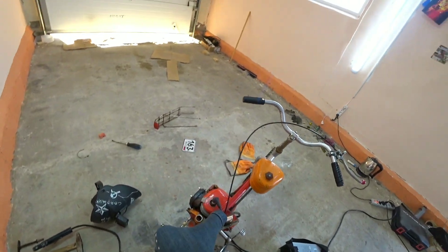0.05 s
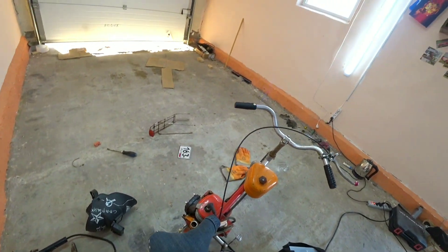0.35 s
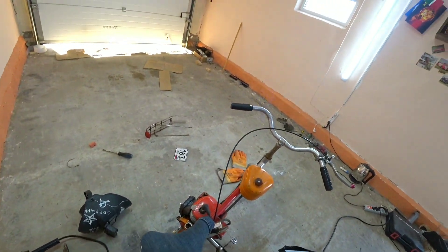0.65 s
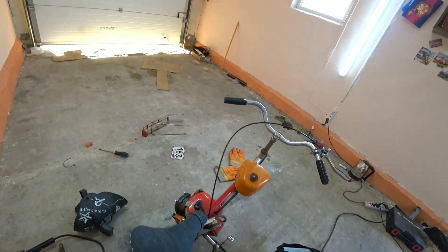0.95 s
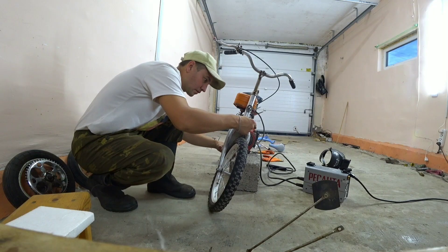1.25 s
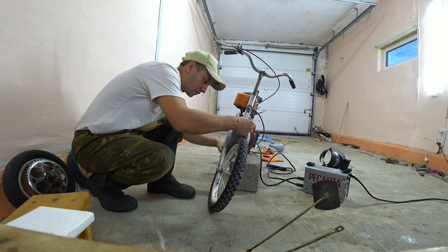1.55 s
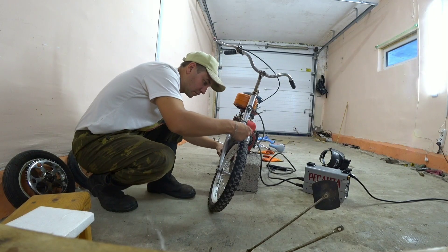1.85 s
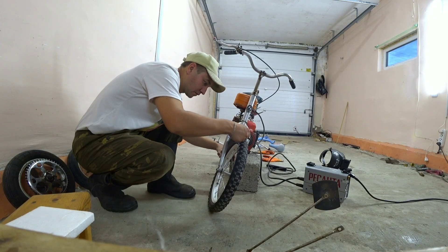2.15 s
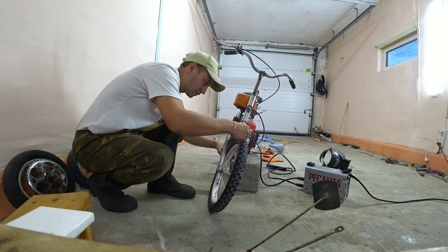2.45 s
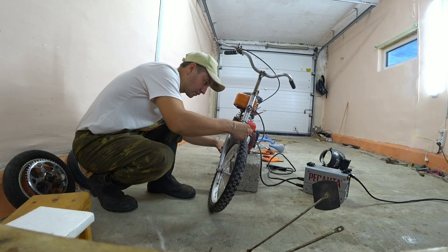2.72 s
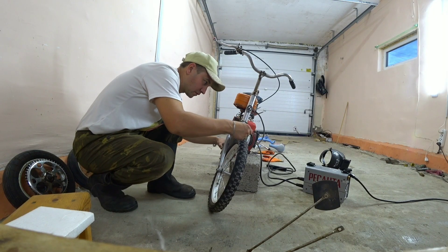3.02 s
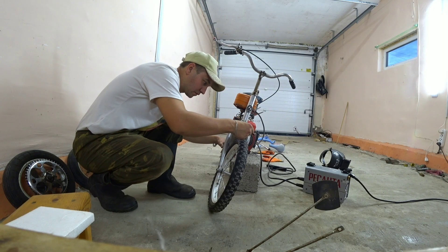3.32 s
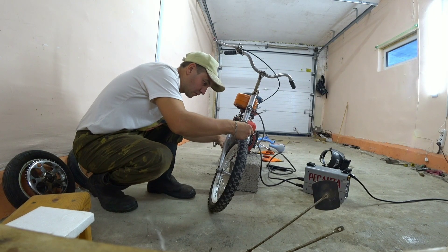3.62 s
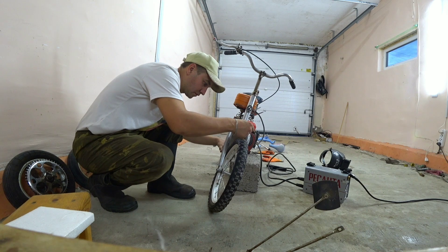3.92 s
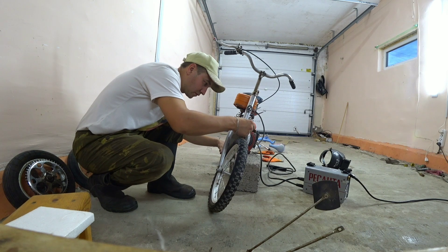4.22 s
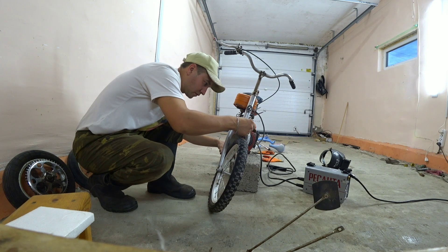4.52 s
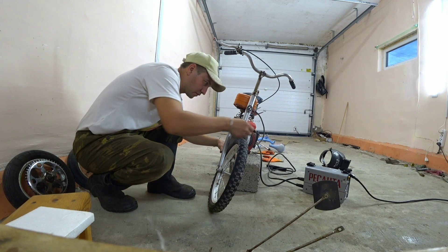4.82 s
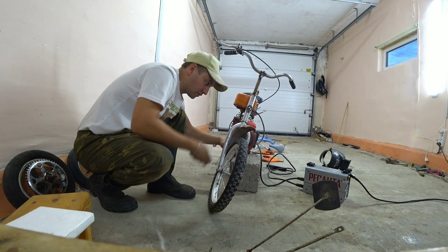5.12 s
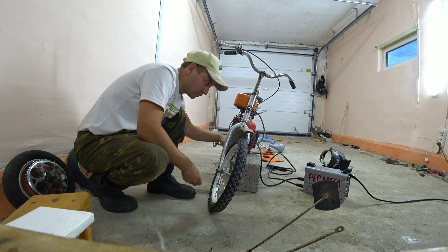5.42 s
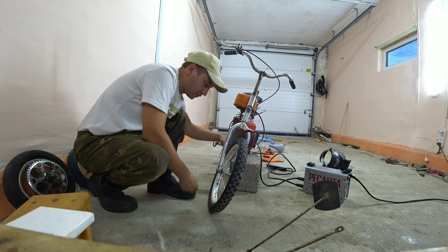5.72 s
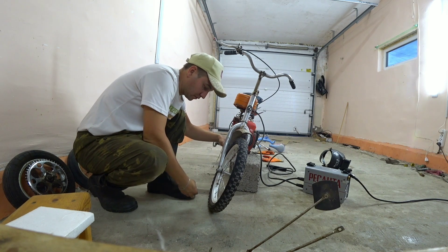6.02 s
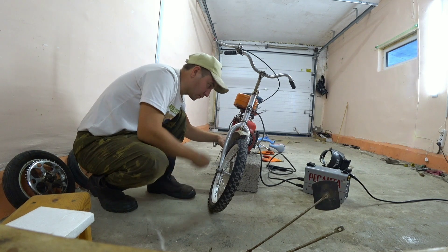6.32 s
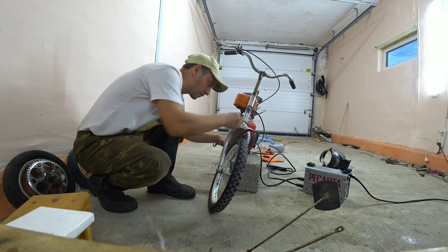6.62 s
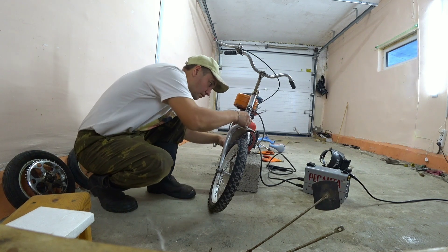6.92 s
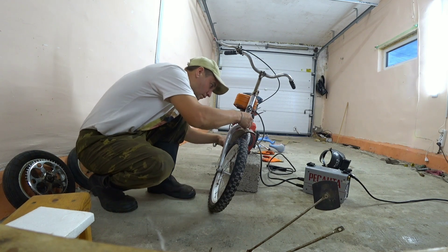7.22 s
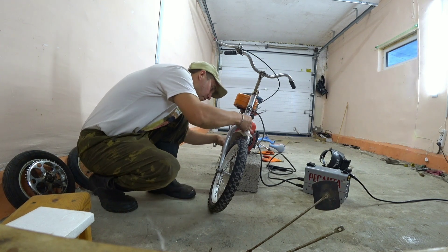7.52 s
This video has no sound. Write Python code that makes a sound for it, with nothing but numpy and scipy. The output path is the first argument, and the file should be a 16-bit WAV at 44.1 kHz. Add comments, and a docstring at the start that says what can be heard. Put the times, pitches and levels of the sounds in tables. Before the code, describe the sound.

A thin steel mudguard clinks, taps and clatters against a moped's fork, with soft rubbing and shuffling in an echoing garage.

```python
"""A thin steel mudguard is tried against a moped's front wheel in a bare concrete garage.
Over a faint hiss, clothes and shoes shuffle and the steel rubs along the tyre. Light taps and
dull bumps follow, then a loud clatter on the fork at 1.5 s. More clinks come, ringing differently
as the grip bends the steel, while a low drone, like a far engine, swells outside near 4 s and fades.
A last burst of clatter, just after 7 s, rings off the bare walls."""
import sys
import numpy as np
from scipy import signal
from scipy.fft import rfft, irfft
from scipy.io import wavfile

SR = 44100
rng = np.random.default_rng(int(sys.argv[2]) if len(sys.argv) > 2 else 0)


def inscribe(sig):
    """Save sig as 16-bit PCM at rate SR to the path in sys.argv[1].

    A 1-D sig is mono; a 2-D sig holds one channel per row.
    Samples are clipped to [-1, 1] before scaling.
    """
    pcm = np.round(np.clip(np.atleast_2d(sig).T, -1, 1) * 32767)
    wavfile.write(sys.argv[1], SR, pcm.astype(np.int16))


N = 341775
TIME = np.arange(N) / SR


def from_db(db):
    """Turn decibels into a number to multiply by."""
    return 10 ** (np.asarray(db) / 20)


def unit_energy(x):
    """Scale a sound so that its squares add up to one."""
    return x / np.sqrt(np.sum(x ** 2) + 1e-20)


def at_pitch(table, hz):
    """Read between the rows of a table, with pitch counted in octaves."""
    known_hz, values = np.transpose(table)
    return np.interp(np.log(np.maximum(hz, 1)), np.log(known_hz), values)


def fade(t, fade_s):
    """Die away by 60 dB in fade_s seconds."""
    return np.exp(-np.log(1000) * t / np.maximum(fade_s, 1e-3))


def noise(colour, size=N, low_hz=0, high_hz=SR):
    """Noise with an average power of one; its colour says how strong each pitch is."""
    hz = np.arange(size // 2 + 1) * SR / size
    gain = from_db(at_pitch(colour, hz)) * (hz >= low_hz) * (hz < high_hz)
    return unit_energy(irfft(rfft(rng.standard_normal(size)) * gain, size)) * np.sqrt(size)


def stereo(shared, side, width):
    """Left and right share one sound; a side sound, added to one and taken from the other, widens it."""
    size = len(shared)
    hz = np.arange(size // 2 + 1) * SR / size
    side = irfft(rfft(side) * from_db(at_pitch(width, hz)), size)
    return np.array([shared + side, shared - side])


# Colour of the background hiss: pitch_hz, level_db
AIR_COLOUR = [(12, -38), (20, 0.5), (59, -1), (141, -8.5), (365, -8.5), (619, -12), (1110, -10),
              (1500, -15), (4250, -18), (6490, -23), (7800, -18), (9140, -26.5), (10200, -22), (11000, -29),
              (14300, -67), (22000, -120)]
# How wide the hiss sounds: pitch_hz, side_db
AIR_WIDTH = [(60, -18), (110, -5), (190, -2), (350, 0), (620, 4.5), (1120, 2.5), (2000, 3), (3590, -3),
             (6440, -1.5), (11600, -4)]
# A small step up in the hiss: time_s, change_db
AIR_STEP = [(.98, -1), (1.0, 2)]


def still_air(level_db=-55):
    """A faint rumble and hiss fill the garage."""
    gain = from_db(level_db + np.interp(TIME, *np.transpose(AIR_STEP)))
    return gain * stereo(noise(AIR_COLOUR), noise(AIR_COLOUR), AIR_WIDTH)


# Movements while holding the mudguard: start_s, length_s, steel_db, cloth_db
STROKES = [(0.0, .05, -53, -49), (0.099, .06, -50.5, -74), (0.991, 0.12, -39.5, -50.5),
           (1.299, 0.1, -38, -57), (1.384, 0.068, -39, -42), (2.722, 0.039, -44.5, -68),
           (4.71, 0.27, -45, -50.5), (4.98, 0.1, -41, -54), (5.578, 0.022, -44, -46),
           (5.633, 0.15, -48.5, -67), (6.255, 0.035, -46, -66), (6.606, 0.057, -39.5, -51),
           (6.88, 0.028, -39.5, -60), (7.097, 0.28, -48.5, -56.5)]
# Colour of steel rubbing on the tyre: pitch_hz, level_db
RUB_COLOUR = [(470, -62), (800, 1), (964, 0.5), (1090, -3.5), (1250, -4), (1760, -7), (2240, -1.5),
              (3190, -6), (3920, -1.5), (4890, -4.5), (5330, -4.5), (5760, -6), (11000, -23.5),
              (14300, -57), (22000, -120)]
# Colour of clothes and shoes: pitch_hz, level_db
CLOTH_COLOUR = [(82, -42), (140, -20), (194, 4), (226, -0.5), (380, -1), (549, -3), (1250, -6.5),
                (1600, -11), (2080, -41), (3520, -120)]


def rub_and_rustle(steel_trim_db=-3.5, cloth_trim_db=-2.5, catches_per_s=1100, catch_spread_db=7):
    """Steel slides in many tiny catches, while cloth and soles rustle lower down."""
    rise_s, release_s, sag_db, catch_s = 0.0091, 0.017, 3.5, 0.0035
    steel_gain, cloth_gain = np.zeros((2, N))
    for start_s, length_s, steel_db, cloth_db in STROKES:
        t = TIME - start_s
        on_off = np.clip(np.minimum(t / rise_s, 1 + (length_s - t) / release_s), 0, 1)
        stroke = on_off * from_db(-sag_db * np.clip(t / length_s, 0, 1))
        steel_gain += stroke * from_db(steel_db + steel_trim_db)
        cloth_gain += stroke * from_db(cloth_db + cloth_trim_db)
    caught = rng.random(N) < catches_per_s / SR
    catches = caught * from_db(catch_spread_db * np.minimum(rng.exponential(1, N), 4))
    fading_catches = signal.lfilter([1], [1, -np.exp(-1 / (catch_s * SR))], catches + 1e-18)
    roughness = unit_energy(fading_catches) * np.sqrt(N)
    return steel_gain * roughness * noise(RUB_COLOUR) + cloth_gain * noise(CLOTH_COLOUR)


# Where the five bands of a knock (thud, bend, clang, clink, sizzle) are heard: pitch_hz
BAND_PITCHES = [400, 1300, 2600, 4100, 7000]


def band_levels(level_db, pitch_hz, thinness_db, contact_s):
    """A knock weakens to both sides of its main pitch; a longer contact loses more treble."""
    treble_fall_db = 9 + 1788 * contact_s   # per octave
    octaves = np.log2(np.array(BAND_PITCHES) / pitch_hz)
    levels_db = level_db - np.where(octaves < 0, thinness_db, treble_fall_db) * np.abs(octaves)
    levels_db[0] -= 7   # steel on steel gives little thud
    return levels_db


# The steel's clear notes; the grip sets the first one's pitch: pitch_hz, level_db, fade_s
STEEL_NOTES = [(1260, 4, 0.15), (1626, -18.5, .25), (1890, -28, 0.16), (2016, -13, 0.17),
               (2128, -11, 0.092), (2307, 1, 0.15), (2607, 1, 0.076), (2714, 5, 0.067), (2790, -0.5, 0.082),
               (3380, -6.5, 0.17), (3940, -5, 0.079), (4020, 6.5, 0.05), (4124, -2, 0.08),
               (4356, 7.5, 0.042), (4430, -1, 0.11), (4530, 1.5, 0.076), (4780, 2.5, 0.11),
               (5540, 17, 0.025), (5900, -23, 0.11), (6320, 2, 0.15), (6550, -8, 0.15), (7310, 4.5, 0.097),
               (8660, 4, .1), (9960, -28, 0.068)]
# The five bands, each with a crowd of notes too close to tell apart:
# low_hz, high_hz, band_db, crowd_fade_s, crowd_db, clash_share
BANDS = [(60.9, 1200, 6.5, 0.45, 0, 1), (924, 1750, 2, 0.072, 4.5, 1.1), (1690, 3200, -0.5, 0.18, -1, 2.4),
         (3104, 5200, 0, 0.053, 2, 1.8), (5020, 11500, 1.5, 0.04, 6.5, 0.21)]
# Colour of those crowded notes: pitch_hz, level_db
STEEL_COLOUR = [(60, -8), (130, -13.5), (200, -5.5), (310, 0), (550, -7), (850, -1), (1200, 6.5), (1650, 4),
                (2100, 2), (3200, -1), (4200, 11), (5200, -1), (6400, -4), (8000, -9.5), (11000, -11.5)]


def touch_db(hz, pitch_hz, focus_db, dull_db):
    """The spot that is hit favours a clang, a clink and, if its pitch is that high, a sizzle."""
    clang_from, clink_from, sizzle_from = (band[0] for band in BANDS[2:])
    clang_hz, clink_hz = min(pitch_hz, 2710), np.clip(pitch_hz, 3800, 4760)
    favoured_hz = np.select([hz < clink_from, hz < sizzle_from], [clang_hz, clink_hz], pitch_hz)
    focused = (hz >= clang_from) & ((hz < sizzle_from) | (pitch_hz >= sizzle_from))
    octaves_away = np.abs(np.log2(hz / favoured_hz))
    octaves_into_sizzle = np.maximum(np.log2(hz / sizzle_from), 0)
    return -focus_db * octaves_away * focused - dull_db * octaves_into_sizzle


def knock(levels_db, bend_hz, pitch_hz, clash_db, contact_s, scatter_db=3, crowd_focus=0.29):
    """One touch sets the steel ringing with clear notes and a noisy clash of crowded ones."""
    t = TIME[:SR // 3]
    hz, note_db, fade_s = np.transpose(STEEL_NOTES)
    hz = np.append(bend_hz, hz[1:])
    focus_db = 82 / (1 + from_db(clash_db))   # a hard clash wakes all notes alike
    dull_db = 0.99 * max(levels_db[3] - levels_db[4], 0)   # weak sizzle also means a duller top
    note_db = note_db + touch_db(hz, pitch_hz, focus_db, dull_db)
    note_db += scatter_db * rng.standard_normal(len(hz))
    strength = from_db(note_db) * rng.choice([-1, 1], len(hz))
    notes = strength[:, None] * np.sin(2 * np.pi * hz[:, None] * t) * fade(t, fade_s[:, None])
    build_up = 1 - np.exp(-t / max(contact_s, 1e-4))   # slower for a sliding touch
    out = 0
    for level_db, band in zip(levels_db, BANDS):
        low_hz, high_hz, band_db, crowd_fade_s, crowd_db, clash_share = band
        clear = unit_energy(notes[(hz >= low_hz) & (hz < high_hz)].sum(axis=0))
        grid_hz = np.geomspace(low_hz, high_hz, num=24)[1:-1]
        colour_db = at_pitch(STEEL_COLOUR, grid_hz)
        colour_db += touch_db(grid_hz, pitch_hz, crowd_focus * focus_db, dull_db)
        crowd = noise(np.column_stack([grid_hz, colour_db]), len(t), low_hz, high_hz)
        crowd = unit_energy(crowd * fade(t, crowd_fade_s))
        ring = clear + from_db(crowd_db + clash_share * clash_db) * crowd
        out += from_db(level_db + band_db) * unit_energy(ring * build_up)
    return out * np.sqrt(0.023 * SR)   # as much energy as holding each level for 0.023 s


# Touches on the fork; more thinness means less bass, more clash means a noisier ring:
# start_s, level_db, pitch_hz, thinness_db (per octave), clash_db, contact_s
FORK_TOUCHES = [(0.107, -56, 4500, 7, 5, .0004), (0.992, -44.5, 4980, 11, 15, .0006),
                (1.106, -31, 2320, 28, 2, 0.00077), (1.334, -42, 4100, 0, 10.5, .012),
                (1.465, -17, 4230, 11.5, 0.5, 0.00019), (1.506, -13.5, 6460, 8, 24, 0.00054),
                (1.5246, -15, 4430, 6, 16, 0.0024), (2.02, -57.5, 3400, 2.5, 13, 0.0018),
                (2.752, -21.5, 3910, 14.5, -4, 0.0027), (2.7626, -28.5, 1360, 15, -27, 0.0013),
                (2.87, -36, 2640, 9, 1, 0.0024), (2.905, -40, 3880, 6.5, 8, 0.0012),
                (3.212, -28.5, 6300, 5.5, -2, 0.00071), (3.221, -27.5, 4900, 22, 25, 0.00079),
                (3.272, -40, 2290, 10, -20, 0.0043), (3.508, -48, 2600, 6.5, 4, 0.0013),
                (3.773, -38, 2740, 10, -0.5, 0.0013), (3.782, -37, 1206, 9.5, -20, 0.01),
                (3.95, -31.5, 4060, 10, 12, 0.00033), (4.129, -45, 3500, 1, 4, 0.0027),
                (4.73, -41.5, 2250, 10.5, 0, 0.0033), (5.002, -41.5, 4500, 5.5, 6, .002),
                (5.098, -22.5, 4460, 7.5, 8, .0005), (5.1158, -18, 4070, 10.5, 0.5, 0.00052),
                (5.427, -32, 2390, 14, -2, 0.00044), (5.816, -51, 4550, 2.5, -10, 0.0017),
                (6.052, -48, 4060, 6.5, -27, .001), (6.197, -54, 2800, 8, -0.5, 0.00037),
                (6.53, -44.5, 4700, 8.5, -1, .0005), (6.627, -26, 2280, 16, -3, 0.00091),
                (6.885, -47.5, 5000, 21, -5, 0.0023), (6.988, -42, 2840, 26, -3.5, 0.00048),
                (7.133, -49.5, 4540, 14, -12, 0.00092), (7.283, -20, 2674, 31.5, -27, 0.0028),
                (7.339, -19.5, 3960, 31, -22, 0.0049), (7.346, -19, 4160, 18.5, -6, 0.00039),
                (7.3585, -21.5, 4160, 16, -10, .0006), (7.39, -24, 4170, 13, 0.5, 0.0011),
                (7.532, -23.5, 3820, 11.5, -6.5, 0.0011), (7.548, -20.5, 4100, 23, -22, 0.011),
                (7.558, -13.5, 4130, 15.5, -8, 0.0013), (7.564, -14, 3100, 33, -20, 0.00098),
                (7.574, -28, 7700, 16, -26, .0006), (7.588, -29, 4350, 7.5, -1, 0.0022)]
# The note of the whole arch bending, set by the grip: time_s, pitch_hz
GRIP_PITCH = [(1.1, 1398), (2.9, 1387), (3.21, 1344), (3.77, 1210), (5.1, 1244), (7.6, 1280)]


def mudguard():
    """The mudguard knocks on the fork; the grip stiffens its arch and moves its lowest note."""
    out = np.zeros(N + SR)
    for start_s, level_db, pitch_hz, thinness_db, clash_db, contact_s in FORK_TOUCHES:
        levels_db = band_levels(level_db, pitch_hz, thinness_db, contact_s)
        bend_hz = np.interp(start_s, *np.transpose(GRIP_PITCH))
        ring = knock(levels_db, bend_hz, pitch_hz, clash_db, contact_s)
        start = int(start_s * SR)
        out[start:start + len(ring)] += ring
    return out[:N]


# Dull bumps against the tyre: start_s, level_db
TYRE_BUMPS = [(0.11, -58), (1.525, -47.5), (3.95, -53), (5.099, -39), (5.584, -54), (6.196, -56.5),
              (6.627, -40), (7.39, -52.5), (7.5, -48.5)]


def tyre_bumps(boost_db=8):
    """Soft rubber wakes only the low notes of the steel."""
    out, t = np.zeros(N + SR), TIME[:SR // 3]
    for start_s, level_db in TYRE_BUMPS:
        thud = noise(STEEL_COLOUR, len(t), low_hz=191, high_hz=760) * fade(t, fade_s=0.15)
        start = int(start_s * SR)
        out[start:start + len(t)] += from_db(level_db + boost_db) * thud
    return out[:N]


# Swells of the drone: middle_s, level_db, half_length_s
DRONE_SWELLS = [(2.65, -61, .3), (3.924, -52, 0.8), (5.315, -58.5, 0.25)]
# Tones in the drone: pitch_multiple, level_db
DRONE_TONES = [(1, 1), (3, -12), (5, -41)]


def far_drone(pitch_hz=67, resting_db=-70.5):
    """A low hum with odd overtones comes through the door in slow swells."""
    hum = sum(from_db(db) * np.sin(2 * np.pi * multiple * pitch_hz * TIME)
              for multiple, db in DRONE_TONES)
    swells = sum(from_db(db) * np.exp(-((TIME - middle_s) / half_length_s) ** 2)
                 for middle_s, db, half_length_s in DRONE_SWELLS)
    return np.sqrt(2) * hum * (from_db(resting_db) + swells)


# How long the garage echoes: pitch_hz, fade_s
ECHO_FADES = [(150, 0.51), (400, 1), (1000, 0.9), (2000, 0.77), (2800, 0.66), (4000, 0.83), (5500, 0.51),
              (8000, 0.66), (11000, 0.38)]
# How wide the echo sounds: pitch_hz, side_db
ECHO_WIDTH = [(60, -13.5), (130, -18), (600, -10), (1100, -6.5), (2000, -10.5), (4000, -17.5), (6500, -11),
              (11000, -2)]


def garage(sound, build_up_s=0.0032):
    """Bare walls add a long, smooth echo whose highest treble dies first."""
    t = TIME[:SR]
    edges_hz = np.append(0, np.geomspace(200, 12000, num=12))
    build_up = 1 - np.exp(-t / build_up_s)
    tails = 0
    for low_hz, high_hz in zip(edges_hz, edges_hz[1:]):
        reflections = noise([(1, 0)], 2 * SR, low_hz, high_hz).reshape(2, SR)   # flat colour
        band_gain = np.sqrt(2 * (high_hz - low_hz) / SR)
        fade_s = at_pitch(ECHO_FADES, (low_hz + high_hz) / 2)
        tails += reflections * band_gain * unit_energy(fade(t, fade_s) * build_up)
    echo = stereo(*tails, ECHO_WIDTH)
    echo[:, 0] += 1   # the sound that arrives directly
    return signal.fftconvolve(sound[None], echo, axes=1)[:, :N]


def scene(left_db=-2.5, right_db=-0.5):
    """The work sounds a little to the right, over the drone and the still air."""
    work = garage(mudguard() + tyre_bumps() + rub_and_rustle())
    return work * from_db([[left_db], [right_db]]) + far_drone() + still_air()


def record(dry, ceiling=0.88, cutoff_hz=11050):
    """The loudest peaks are rounded off and the highest treble is cut."""
    rounded = dry / (1 + (dry / ceiling) ** 6) ** (1 / 6)
    treble_cut = signal.ellip(10, 0.2, 70, cutoff_hz, fs=SR, output="sos")
    return signal.sosfilt(treble_cut, rounded)


dry = scene()
out = record(dry)
inscribe(out)
```